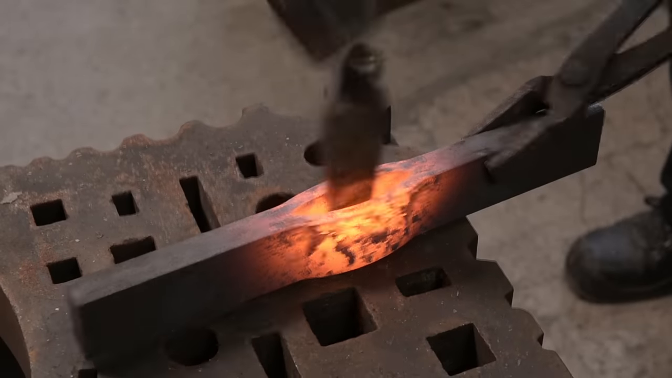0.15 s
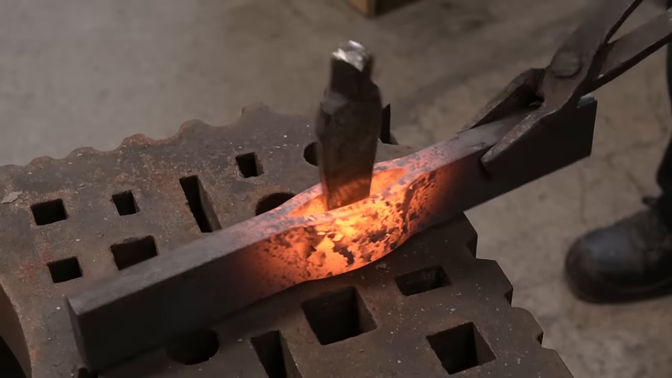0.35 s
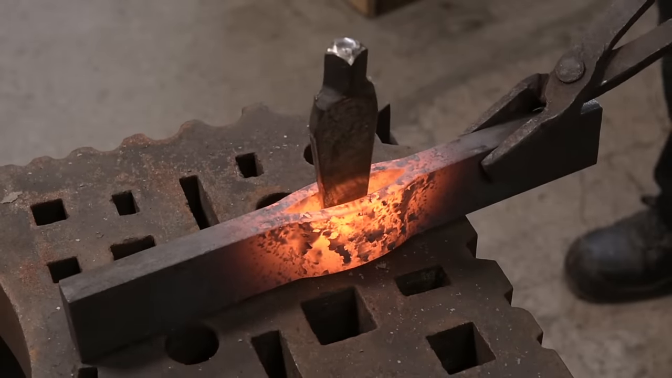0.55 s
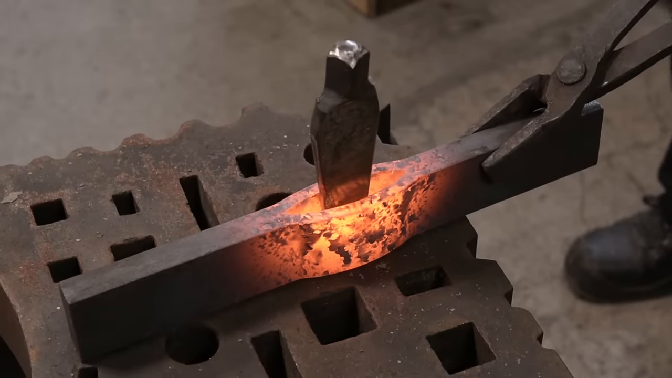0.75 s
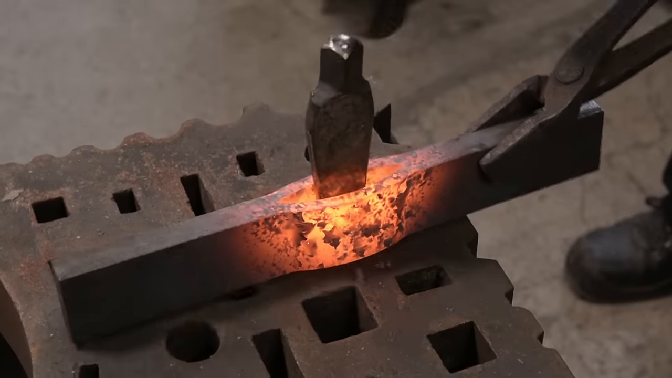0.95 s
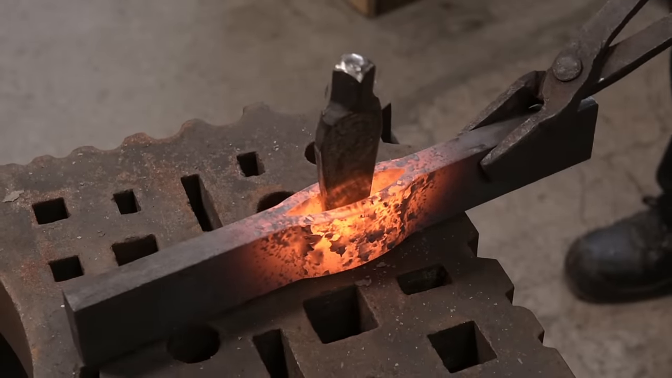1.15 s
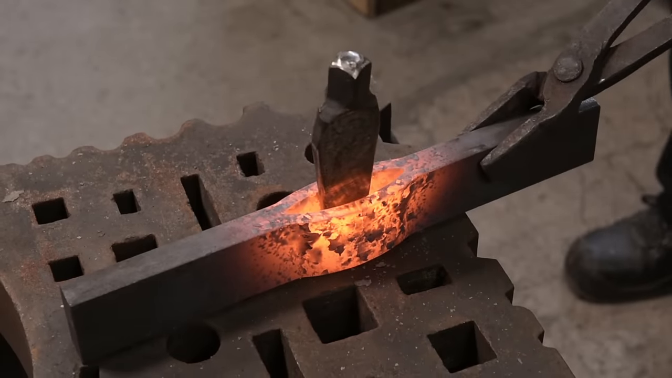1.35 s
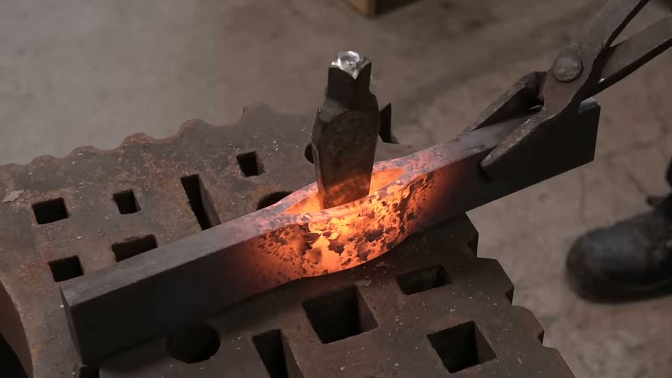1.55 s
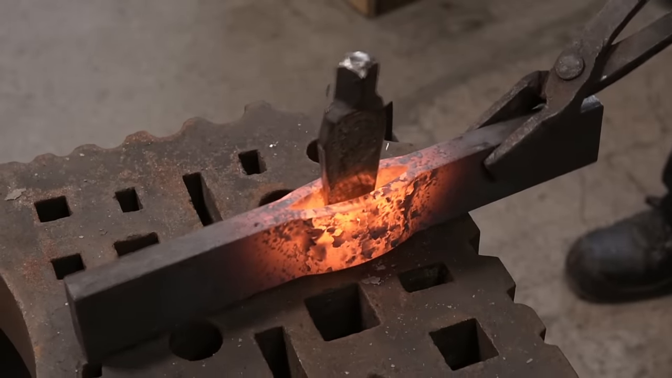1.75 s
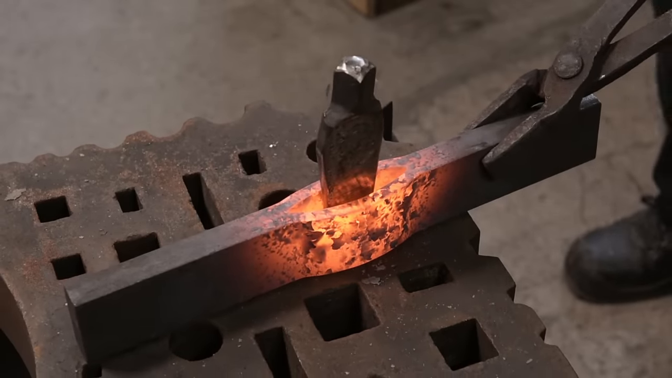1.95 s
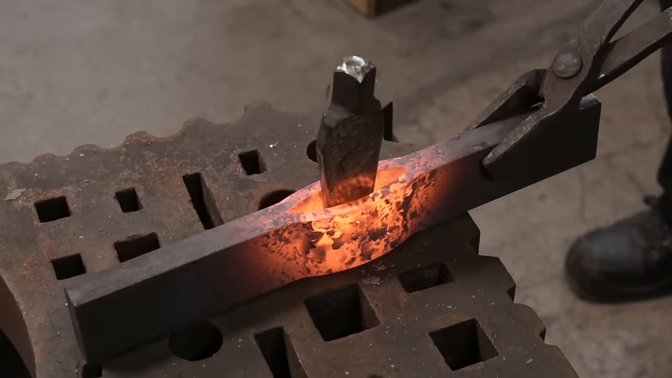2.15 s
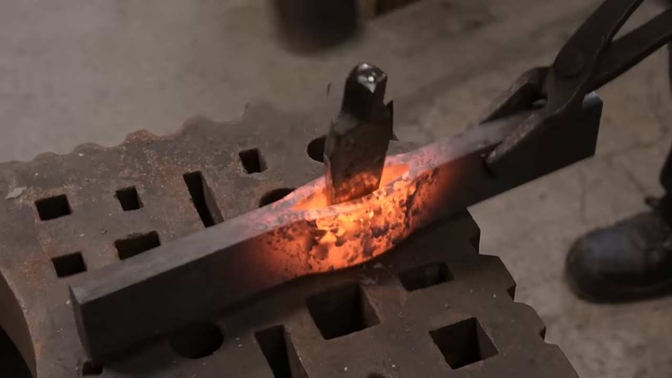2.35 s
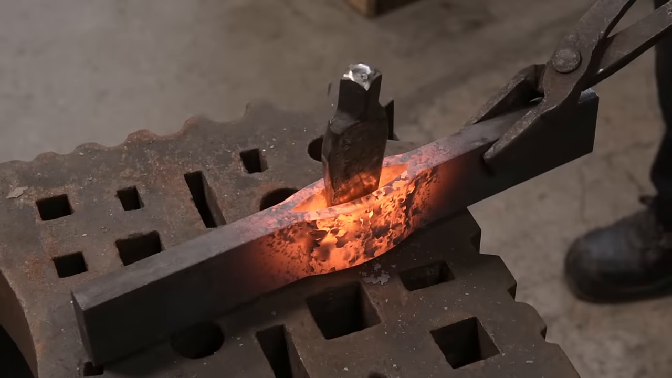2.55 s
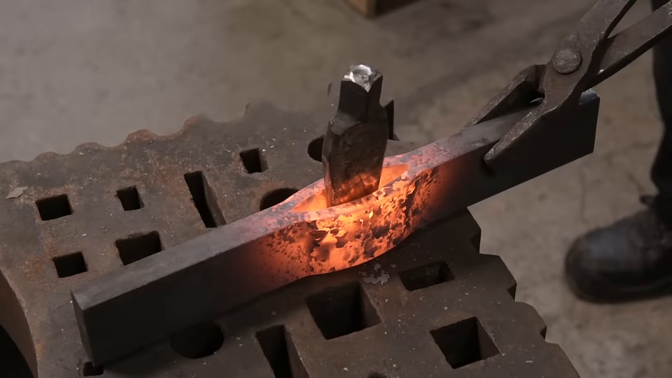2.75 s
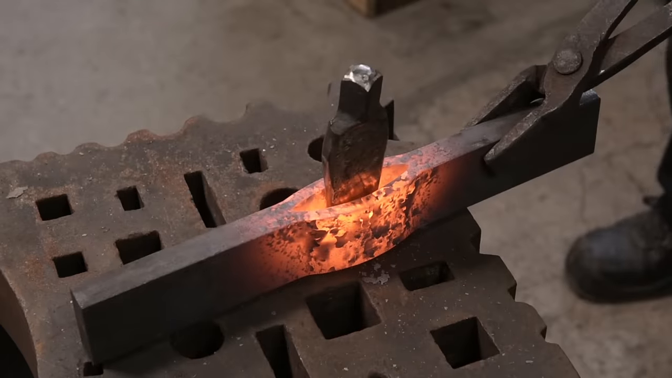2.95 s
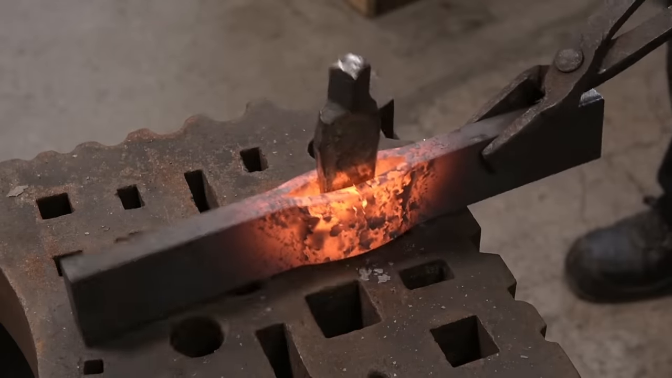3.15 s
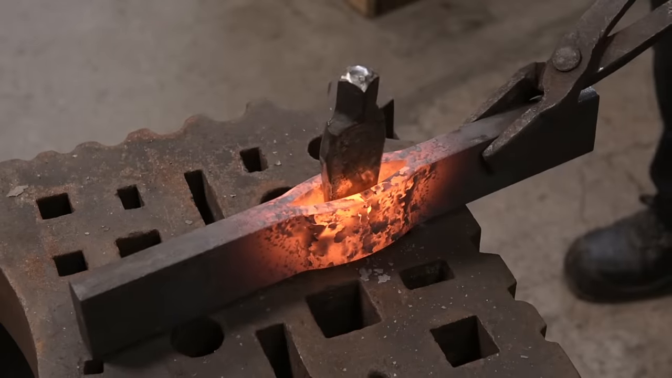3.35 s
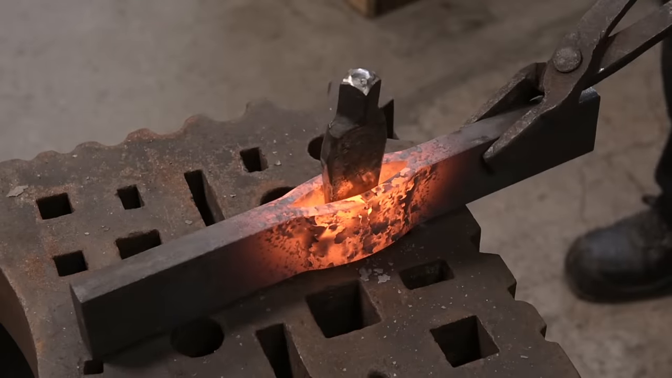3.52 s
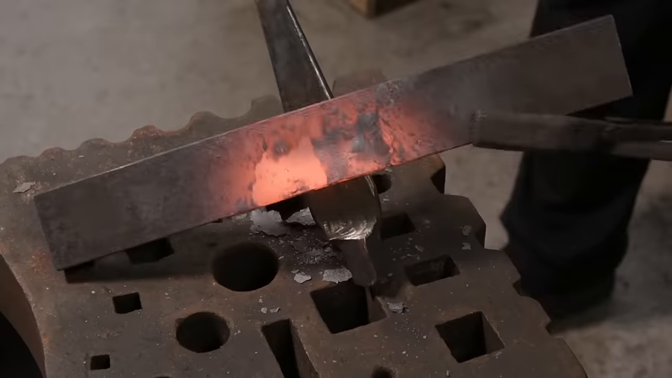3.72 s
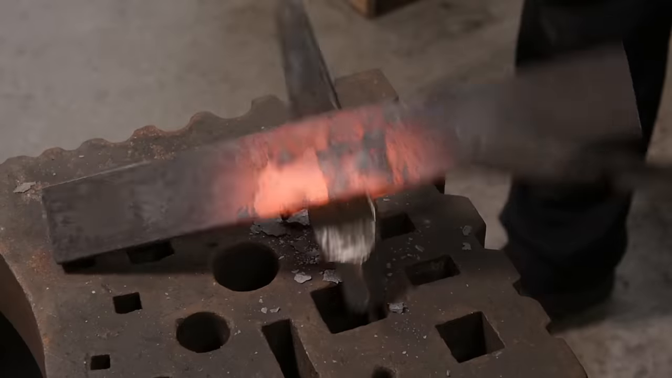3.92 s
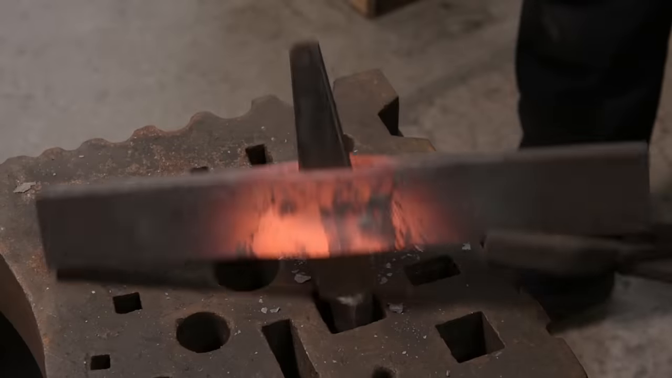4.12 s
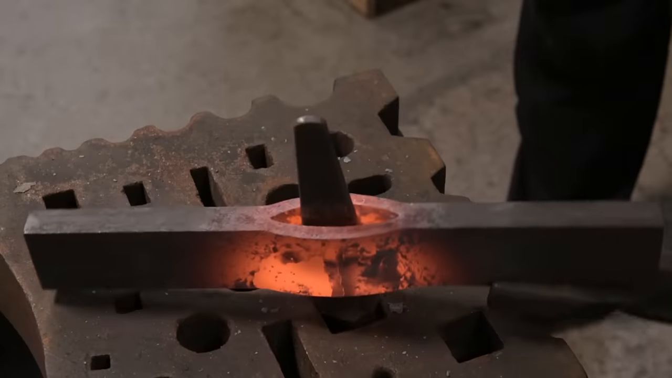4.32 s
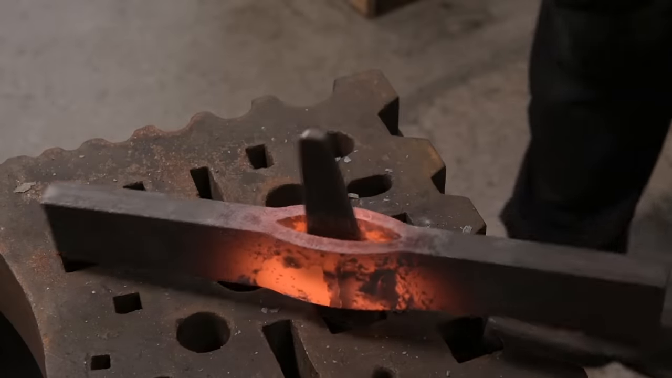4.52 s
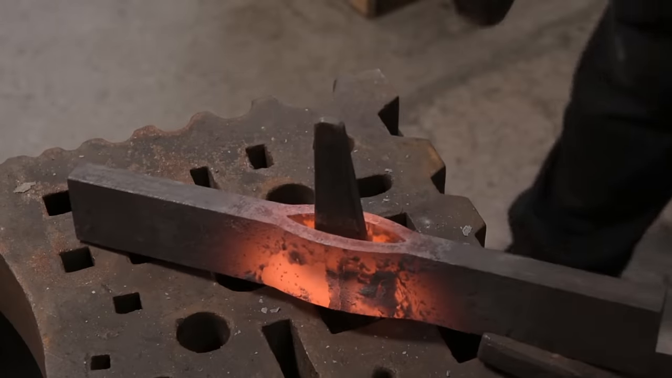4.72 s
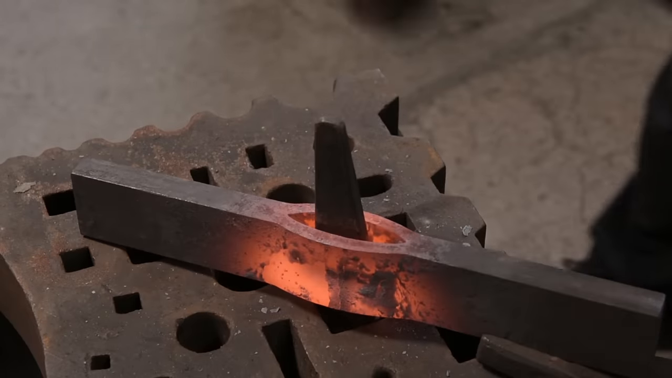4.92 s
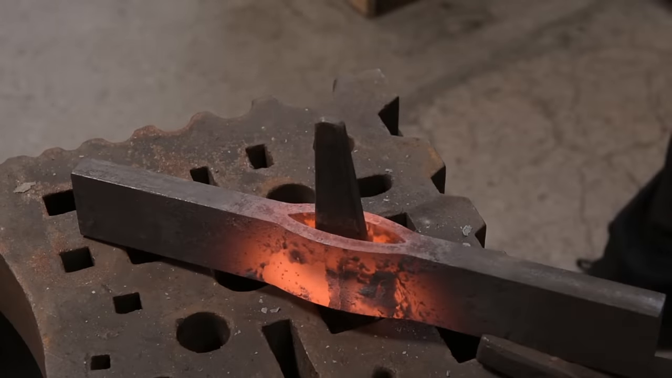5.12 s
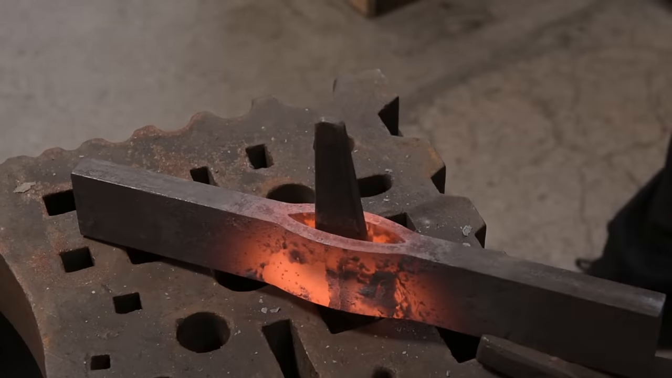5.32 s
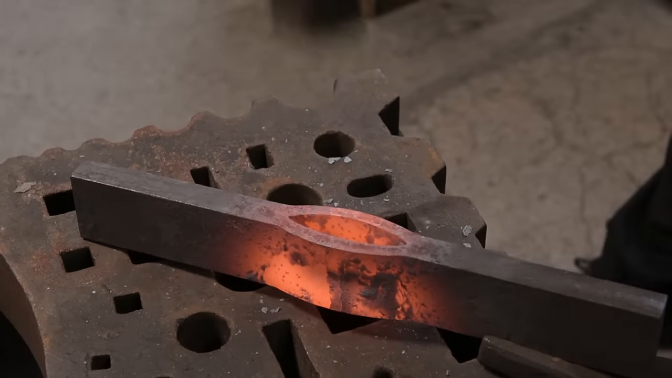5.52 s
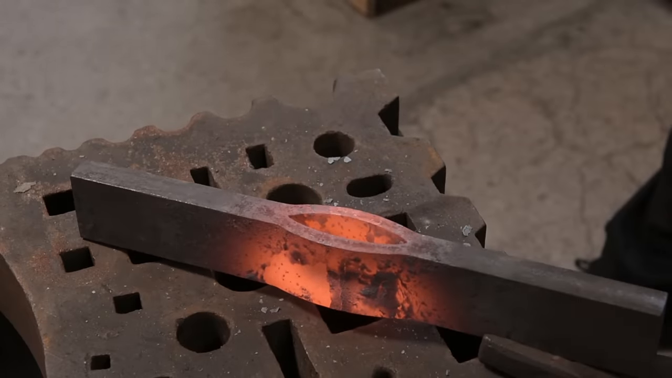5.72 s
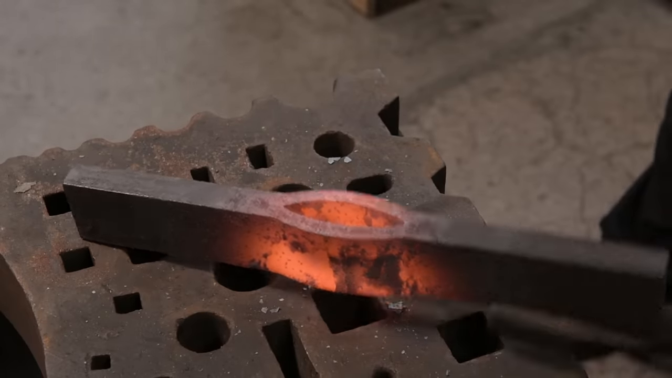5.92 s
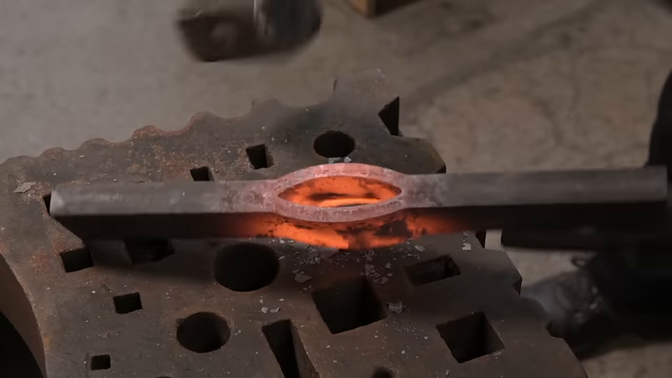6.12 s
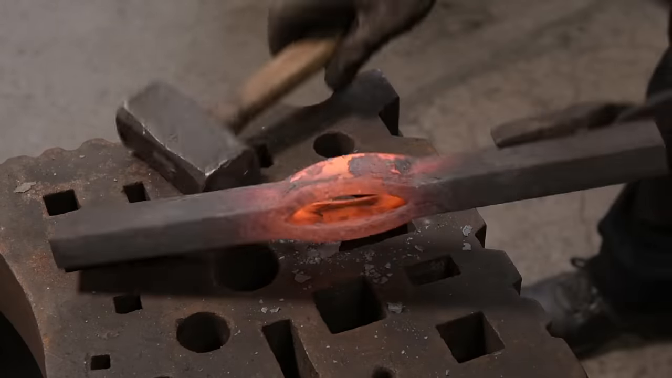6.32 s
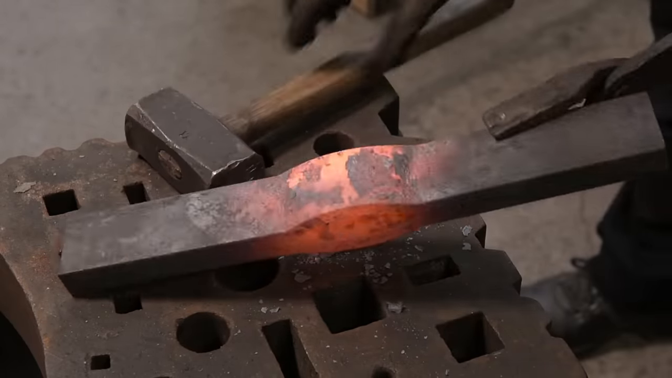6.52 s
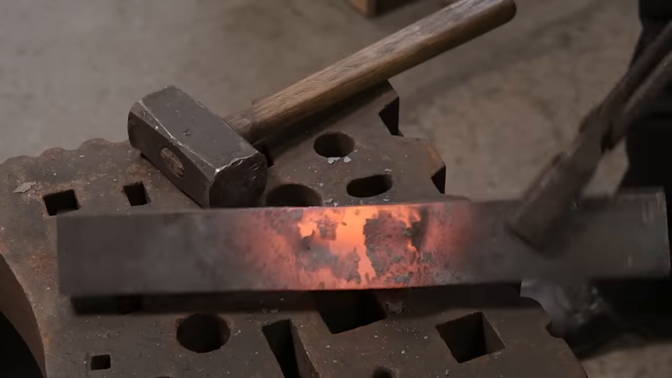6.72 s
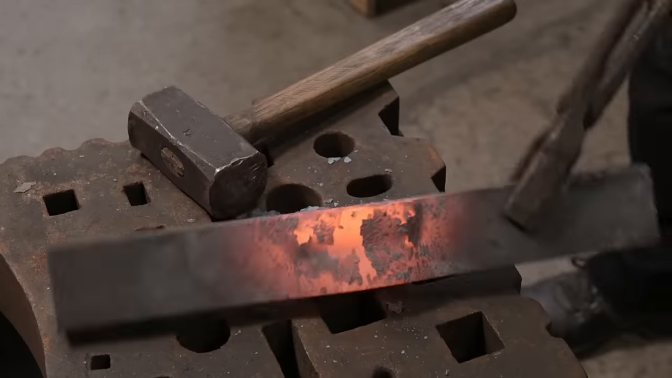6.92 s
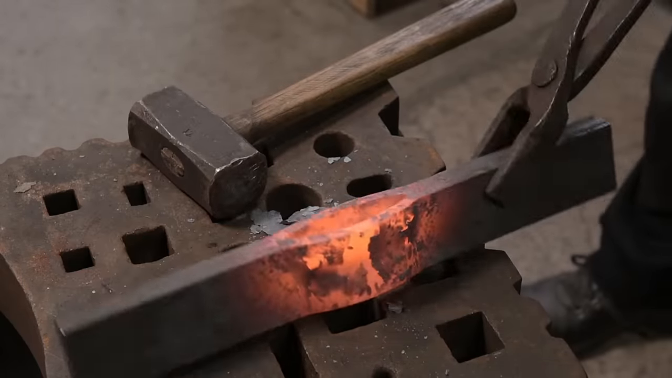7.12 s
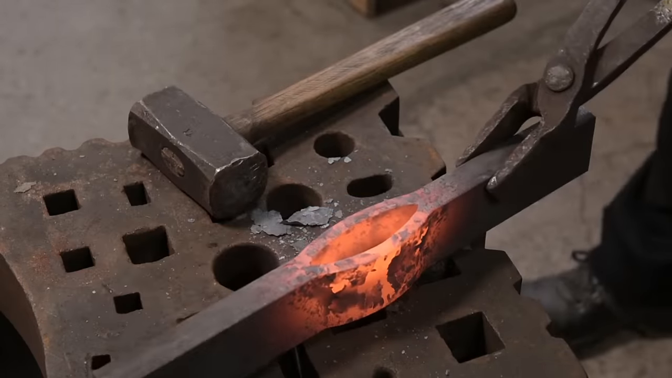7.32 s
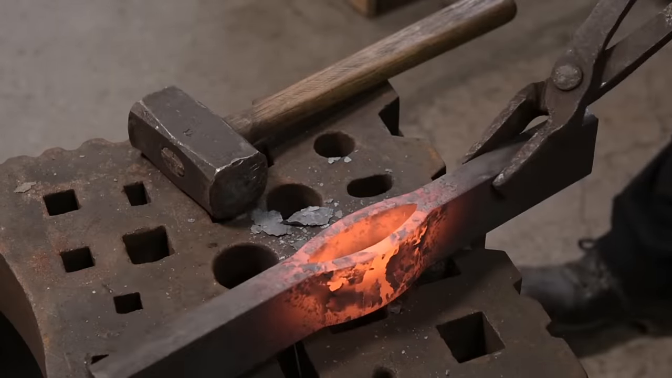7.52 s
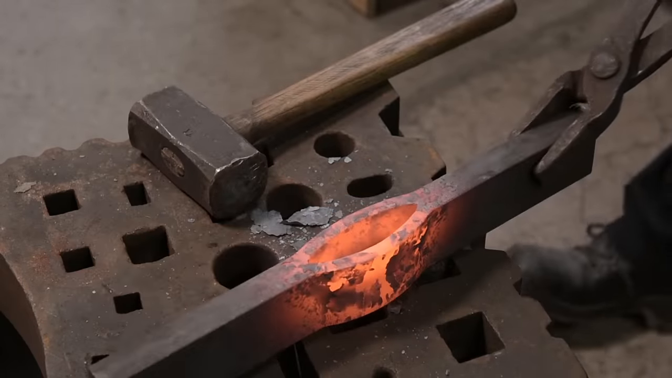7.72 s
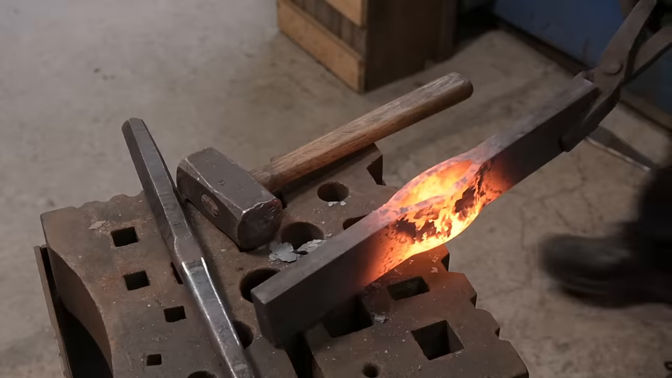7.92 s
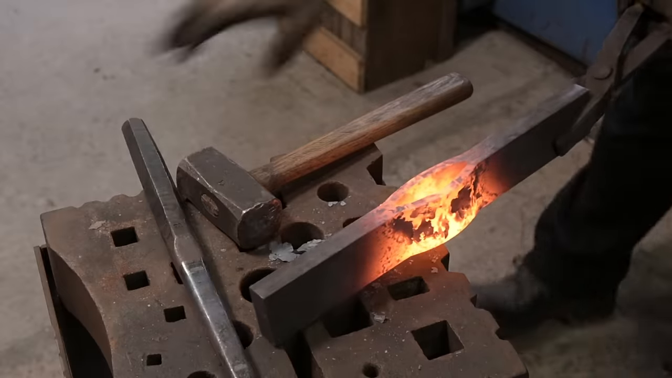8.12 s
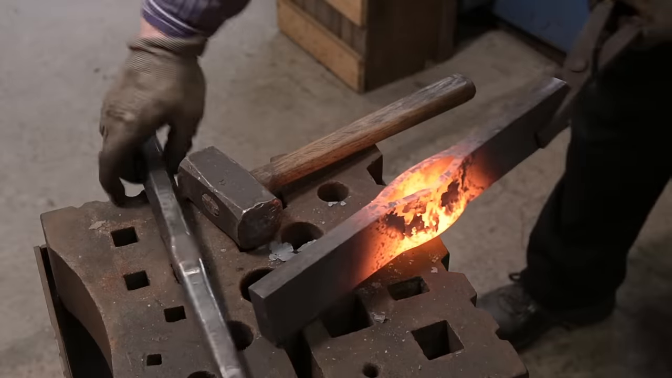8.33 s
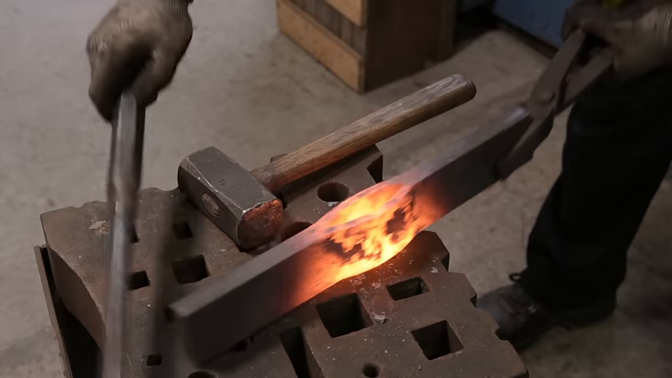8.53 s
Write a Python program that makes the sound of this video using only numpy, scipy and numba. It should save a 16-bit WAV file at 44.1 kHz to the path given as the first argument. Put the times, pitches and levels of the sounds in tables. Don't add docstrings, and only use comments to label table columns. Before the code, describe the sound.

Evenly spaced, heavy hammer cracks with short clangy metal ring and low stand thud, then softer shuffling and knocking as the work is turned. One last blow sends a steel drift singing and tumbling, with hard floor bounces. Hammer and bar clatter down, scrape and settle; a long steel tool is lifted with a bright tick. Close, distorted, compressed, in a reverberant workshop with low hum.

```python
import sys
import numpy as np
from scipy import signal
from scipy.fft import rfft, irfft, next_fast_len
from scipy.io import wavfile
from scipy.ndimage import uniform_filter1d
from numba import njit

SR = 44100
rng = np.random.default_rng(int(sys.argv[2]) if len(sys.argv) > 2 else 0)


def unload_audio(sound):
    columns = np.transpose(np.atleast_2d(sound))
    steps = np.round(np.clip(columns, -1, 1) * 32767)
    wavfile.write(sys.argv[1], SR, steps.astype(np.int16))


def volts(x):
    e = np.asarray(x, float) / 20
    return 10 ** e


N = 382347

# pitch_hz, level_db, t60_s
BLOCK_MODES = [(1220, -19.5, 1), (1232, -16, 0.097), (1260, -8, 0.52), (1366, -6.5, 0.98),
               (1550, -3.5, 0.49), (1688, -1.5, 0.41), (1790, 4, 0.2), (1913, -0.5, 0.21),
               (1940, -0.5, 0.27), (2060, -3.5, 0.35), (2194, -7, 0.3), (2493, -2.5, 0.24), (2780, 3, 0.17),
               (3175, -4, 0.44), (3395, -7.5, 0.54), (3930, -10.5, 0.55), (4163, -20.5, 0.1),
               (5500, -7, 0.11), (6400, -9, 0.15), (7340, -27, 0.18)]
# pitch_hz, level_db, t60_s
STAND_MODES = [(55.2, -2, 1), (64.7, -4.5, .8), (154, -8, 0.44), (202.3, -6.5, 0.44), (240, -20, 0.053)]


def blows():
    # start_s, block_ring_db, crack_db, bright_crack_db, weight_db (shakes stand, rings head)
    hits = [
        (0.2312, 3.5, 9.5, -5.5, -18),
        (0.987, 1.5, 6.5, 8.5, -21),
        (1.7021, 3, 7.5, 4.5, -18),
        (2.3950, 1, 5.5, 3, -24.5),
        (3.0863, 3.5, 10, -1.5, -22.5),
        (5.4536, -14, 4.5, 5.5, -32.5),
    ]
    # pitch_hz, level_db, t60_s
    head_modes = [(11380, 4.5, 0.6), (14350, -2, .4), (5460, 7.5, .25), (6300, 10, 0.22)]
    s, block_db, crack_db, bright_db, weight_db = np.transpose(hits)
    body = struck(BLOCK_MODES, s, block_db - 8.5, spread_db=-4.0, damping=0.18)
    rattle = chatter(BLOCK_MODES, s, block_db - 33.5, t60=0.39, damping=0.14)
    snap = crack(s, crack_db, 1400, 4500, t60=0.075)
    bright_snap = crack(s, bright_db, 3600, 19000, t60=0.02)
    boom = crack(s, crack_db - 9.5, 110, 320, t60=0.081)
    head = struck(head_modes, s, weight_db - 8, spread_db=6.5, damping=0.15)
    thud = struck(STAND_MODES, s + 0.0012, weight_db + 4, spread_db=0.5, damping=1.0)
    return body + rattle + snap + bright_snap + boom + head, thud


def drift():
    # start_s, knock_db, bending_ring_db, twisting_ring_db, upper_ring_db
    bounces = [
        (5.4538, 0, -38, -50, -26),
        (5.7007, 8, -20, -24, -22),
        (5.848, 0, -28, -34, -28),
        (6.0584, 6, -20, -34, -22),
        (6.31, -14, -22, -20, -24),
        (6.408, -14, -50, -22, -23),
        (6.593, -30, -65, -52, -46),
        (6.82, -50, -90, -90, -80),
    ]
    # takeoff_s, main_ring_db, edge_on_s, half_turn_s, beating_twin_db
    tumbling = [(5.4538, -11, 5.2, 1.5, -6), (5.848, -22, 5.7, .6, -6), (6.288, -5, 6.2, .3, -16),
                (6.408, -20, 6.2, .8, -6), (5.7007, 5, 5.752, .115, -30), (5.922, -5, 5.89, .2, -26),
                (6.0584, 8, 6.21, .13, -30), (6.245, -2, 6.23, .12, -30), (6.593, -44, 6.4, .8, -4),
                (6.82, -90, 6.4, .8, -8)]
    # pitch_hz, level_db, t60_s, ring family (0 bending, 1 twisting, 2 upper, 3 lengthwise)
    drift_modes = [(1272, 0, 1.5, 0), (4407, 2, 1.0, 1), (5345, 0, 1.2, 1), (5318, -7, 1.2, 1),
                   (6212, 0, 1.5, 2), (6238, -7, 1.2, 2), (9625, -9, .9, 2), (9962, -9, .7, 2),
                   (13990, 0, .8, 3), (13946, -5, .8, 3), (14400, -5, .8, 3), (15020, -20, .8, 3)]
    rows, flights = np.array(bounces), np.array(sorted(tumbling))
    live = slice(int(rows[0, 0] * SR) + 1, int(7.2 * SR))
    t = time_axis()[live]
    flight = np.clip(np.searchsorted(flights[:, 0], t) - 1, 0, None)
    takeoff, main_db, edge_on, half_turn, twin_db = flights[flight].T
    turn = np.pi * (t - edge_on) / half_turn

    tone = np.sin(2 * np.pi * 3310 * t) + volts(twin_db) * np.sin(2 * np.pi * 3336 * t)
    main_t60_s, beam_width, edge_leak_db = 1.8, 2.2, -18
    facing = np.hypot(np.tanh(beam_width * np.sin(turn)), volts(edge_leak_db))
    main_gain = volts(main_db - 60 * (t - takeoff) / main_t60_s) * facing
    sound = uniform_filter1d(main_gain, size=200) * tone

    last = np.clip(np.searchsorted(rows[:, 0], t) - 1, 0, None)
    since = t - rows[last, 0]
    along_db = -2.5 - 26.5 * (last > 0) - 6 * np.maximum(last - 1, 0)
    family_db = [*rows[last, 2:].T, along_db]
    phase = rng.uniform(0, 2 * np.pi, (len(rows), len(drift_modes)))
    side_beam = np.hypot(np.cos(turn), volts(-8))
    for k, (hz, db, t60, family) in enumerate(drift_modes):
        beam = side_beam if hz < 5000 else np.hypot(np.cos(2.6 * turn + k), volts(-8))
        level_db = family_db[round(family)] + db - 60 * since / t60
        sound += volts(level_db) * beam * np.sin(2 * np.pi * hz * since + phase[last, k])
    rings = np.zeros(N)
    rings[live] = sound

    s, knock_db = rows[:, 0], rows[:, 1]
    floor = crack(s, knock_db + 0.78, 180, 2100, t60=0.017) + crack(s, knock_db - 4, 250, 1900, t60=0.01)
    return rings, floor + crack(s, knock_db - 24, 4500, 15000, t60=0.0087)


def clanks():
    # start_s, peak_db, bright_crack_db and stand_thud_db (both relative to the peak)
    drops = [
        (0.4231, -10.5, -32.5, -17),
        (0.4544, -13, -39, -5),
        (0.5075, -38, -33.5, -31),
        (0.6046, -43, -37, -16.5),
        (4.1665, -32.5, -33, -28),
        (4.724, -27, -33, -42),
        (6.42, -6, -18.5, -26),
        (6.5935, -19, -21, -23),
        (6.6965, -21, -28.5, -22),
        (7.897, -17.5, -37.5, -10.5),
    ]
    # pitch_hz, level_db, t60_s
    bar_modes = [(1600, -12, 0.4), (1720, -2, .35), (1790, 0, 0.5), (1840, 0, 0.5), (1905, 2, 0.3),
                 (1955, -1, 0.3), (2010, -3, 0.4), (2060, -8, .3), (2830, -13, 0.5), (3430, -16, 0.3),
                 (3960, -12, 0.35), (4040, -13, 0.3)]
    s, peak_db, bright_db, thud_db = np.transpose(drops)
    body = struck(bar_modes, s, peak_db - 13.5, spread_db=4.0, damping=0.3)
    body = body + chatter(bar_modes, s, peak_db - 37, t60=0.25, damping=0.2)
    tick = crack(s, peak_db + bright_db - 1, 3500, 19000, t60=0.0057)
    snap = crack(s, peak_db - 7.5, 1400, 3000, t60=0.014)
    jolt = struck(STAND_MODES[:2], s, peak_db + thud_db, spread_db=7.0, damping=0.11)
    return band(body, 1000, 4500) + tick + snap, jolt


def knocks():
    # start_s, block_ring_db, weight_db (dull crack and stand thud), bright_tick_db
    contacts = [(3.716, -32, -30.5, -60), (3.949, -39.5, -39, -63), (4.049, -18, -23.5, -55),
                (4.119, -46, -37.5, -71), (4.166, -32, -30.5, -70), (4.259, -28, -31, -59),
                (4.309, -50.5, -49, -66), (4.66, -50, -47, -72), (4.693, -20.5, -29.5, -51),
                (4.809, -46, -42, -51), (6.283, -4.5, -31, -34), (6.309, -3, -34, -28),
                (6.369, -27, -45, -33.5), (6.406, -31, -47, -23), (6.506, -36, -33, -47),
                (6.594, -6, -32, -49.5), (6.698, -20.5, -40.5, -71), (6.761, -16.5, -39, -83),
                (6.814, -30, -21, -46.5), (6.988, -14, -32.5, -38), (7.362, -51.5, -41, -62),
                (7.766, -35, -42.5, -59), (8.36, -36.5, -50, -62)]
    # start_s, level_db
    scale_ticks = [(4.599, -55), (7.499, -69), (7.534, -60), (8.154, -63.5), (8.271, -55)]
    # pitch_hz, level_db, t60_s
    tong_modes = [(5340, -0.5, 0.15), (7060, -10.5, 0.11), (9200, -21, 0.14), (11380, -23, 0.18),
                  (3690, 10.5, 0.18), (1970, 21, .2)]
    # start_s, level_db
    jaw_taps = [(4.167, -46.5), (4.261, -54), (4.63, -63)]
    # start_s, level_db
    rivet_taps = [(7.767, -50)]
    s, ring_db, weight_db, tick_db = np.transpose(contacts)
    body = struck(BLOCK_MODES[:17], s, ring_db - 22, spread_db=10.5, damping=0.13)
    body = body + crack(s, weight_db, 80, 1400, t60=0.21)
    tick = crack(s, tick_db + 9.5, 4000, 16000, t60=0.006)
    scale = crack(*np.transpose(scale_ticks), 2200, 7900, t60=0.042)
    jaws = struck(tong_modes, *np.transpose(jaw_taps), spread_db=11.5, damping=0.39)
    rivet = struck(tong_modes[1:4], *np.transpose(rivet_taps), spread_db=8, damping=0.74)
    bump = struck(STAND_MODES, s, weight_db - 13.5, spread_db=4.0, damping=1.0)
    return band(body, 80, 3440) + tick + scale + jaws + rivet, bump


def chisel():
    # start_s, low_modes_db, middle_modes_db, high_modes_db, tick_db
    lifts = [
        (8.381, -43, -55, -77, -40),
        (8.402, -66, -18, -17.5, -18.5),
        (8.483, -25.5, -31.5, -54, -28),
        (8.551, -25, -34.5, -48.5, -22),
    ]
    # pitch_hz, level_db, t60_s
    chisel_modes = [(1174, -6, .4), (1540, -5, .35), (2105, 0, .35), (2772, -2, .4), (3289, -2, .15),
                    (3359, 3, .4), (4414, -8, .35), (4549, -14, .2), (4926, -6, .35), (6519, 0, .2),
                    (7967, -18, .15), (8441, -4, .27), (9921, -14, .4), (10670, -12, .33),
                    (12860, -18, .45), (13440, -22, .3), (15340, -10, .35)]
    s, low_db, middle_db, high_db, tick_db = np.transpose(lifts)
    low = struck(chisel_modes[:4], s, low_db, spread_db=1, damping=0.45)
    middle = struck(chisel_modes[4:9], s, middle_db, spread_db=1, damping=0.4)
    high = struck(chisel_modes[9:], s, high_db, spread_db=3, damping=0.71)
    tick = crack(s, tick_db, 900, 5000, t60=0.0077)
    rattle = chatter(chisel_modes[:9], s, middle_db - 31.5, t60=0.45, damping=0.2)
    return low + middle + high + tick + rattle


def drag():
    # start_s, length_s, grit_db, stand_shake_db
    drags = [(3.744, 0.23, -67, -44), (4.043, 0.33, -52, -33), (4.42, .2, -67, -48),
             (4.632, 0.55, -62, -40), (5.851, .07, -14, -60), (6.297, .1, -41, -65),
             (6.409, 0.19, -24.5, -50), (6.69, 0.3, -53, -51), (6.926, 0.13, -43, -47.5),
             (7.104, 0.19, -72, -68), (7.363, 0.21, -79, -42), (7.761, 0.022, -50.5, -65)]
    clicks = rng.random(N) < 5000 / SR
    sizes = volts(4.8 * np.minimum(rng.exponential(1, N), 4))
    grit = clicks * sizes * rng.choice([-1, 1], N)
    ring = through(BLOCK_MODES, 0.3, grit)
    scrape = volts(9.5) * band(grit, 1400, 4300) / np.std(grit)
    sound = band(ring / np.std(ring) + scrape, 750, 6500)
    shake = through(STAND_MODES, 0.14, grit)
    s, length, grit_db, shake_db = np.transpose(drags)
    shape = dict(rise=5995, sag=44, fall=200.5)
    grit_gain = strokes(s, length, grit_db, **shape)
    return grit_gain * sound, strokes(s, length, shake_db, **shape) * shake / np.std(shake)


def scuffs():
    # start_s, length_s, level_db
    brushes = [(4.418, .01, -59.5), (4.609, .02, -54.5), (4.702, 0.22, -90.5), (4.949, .1, -44),
               (6.82, 0.043, -51), (6.949, 0.068, -36), (7.317, .01, -61.5)]
    # pitch_hz, density_db (per Hz)
    scuff_colour = [(470, -44.5), (800, -7), (1330, 0.5), (1840, -0.5), (1930, -0.5), (3130, 1.5),
                    (4710, -10), (15500, -26.5)]
    gain = strokes(*np.transpose(brushes), rise=230, sag=0, fall=230)
    return gain * volts(1.5) * coloured(scuff_colour)


def air():
    # pitch_hz, density_db (per Hz)
    air_colour = [(18, -24), (30, -3.5), (93, 3), (210, -1), (295, -5), (499, -2.5), (1590, -12.5),
                  (1760, -9), (2540, -22), (3310, -15), (5040, -31.5), (13300, -39.5), (16000, -60)]
    return volts(-53 + 1.5) * coloured(air_colour)


def workshop(x):
    # pitch_hz, t60_s
    room_t60 = [(100, 0.57), (300, 0.64), (1000, 0.46), (2500, 0.41), (5000, 0.28), (9000, 0.093),
                (15000, 0.16)]
    # pitch_hz, level_db
    room_colour = [(100, 2), (400, -3), (1500, -2), (4000, 2.5), (9000, 3), (15000, -3)]
    t = np.arange(SR) / SR
    edges = 60 * 2 ** np.arange(0, 8.1, 0.5)
    tail = 0
    for low, high in zip(edges, edges[1:]):
        hz = np.sqrt(low * high)
        fall = volts(at_hz(room_colour, hz) - 60 * t / at_hz(room_t60, hz))
        tail = tail + band(rng.standard_normal(SR), low, high) * fall
    tail = tail * (1 - np.exp(-t / 0.011))
    return signal.fftconvolve(x, tail / np.sqrt(np.sum(tail ** 2)))[:N]


def struck(modes, times, level_db, spread_db, damping):
    chance = rng.standard_normal((len(times), len(modes)))
    strength = volts(level_db[:, None] + spread_db * chance)
    return placed(times, strength @ rings_of(modes, damping))


def crack(times, level_db, low_hz, high_hz, t60):
    noise = band(rng.standard_normal((len(times), SR // 2)), low_hz, high_hz)
    noise = noise[:, 2000:]
    fall = volts(level_db[:, None] - 60 * np.arange(noise.shape[1]) / SR / t60)
    return placed(times, fall * noise / np.std(noise))


def chatter(modes, times, level_db, t60, damping):
    return through(modes, damping, crack(times, level_db, 310, 16000, t60))


def through(modes, damping, force):
    return signal.oaconvolve(force, rings_of(modes, damping).sum(axis=0))[:N]


def rings_of(modes, damping):
    hz, level_db, t60 = np.transpose(modes)[:, :, None]
    t = np.arange(int(1.3 * damping * t60.max() * SR) + 1) / SR
    return volts(level_db - 60 * t / (t60 * damping)) * np.sin(2 * np.pi * hz * t)


def placed(times, sounds):
    out = np.zeros(N + sounds.shape[1])
    for s, sound in zip(times, sounds):
        first = round(s * SR)
        out[first:first + len(sound)] += sound
    return out[:N]


def strokes(start, length, level_db, rise, sag, fall):
    coarse = time_axis()[::32]
    since = coarse - start[:, None]
    length = length[:, None]
    loss_db = rise * np.maximum(-since, 0) + sag * np.clip(since, 0, length)
    loss_db = loss_db + fall * np.maximum(since - length, 0)
    return np.interp(time_axis(), coarse, volts(level_db[:, None] - loss_db).sum(axis=0))


def time_axis():
    return np.arange(N) / SR


def at_hz(points, hz):
    table_hz, value = np.transpose(points)
    return np.interp(np.log(hz), np.log(table_hz), value)


def coloured(spectrum):
    size = next_fast_len(N, real=True)
    hz = np.maximum(np.fft.rfftfreq(size, 1 / SR), 1)
    x = irfft(rfft(rng.standard_normal(size)) * volts(at_hz(spectrum, hz)), size)[:N]
    return x / np.std(x)


def band(x, low_hz, high_hz):
    return signal.sosfilt(signal.butter(2, [low_hz, high_hz], "band", fs=SR, output="sos"), x)


def scene():
    hit, thud = blows()
    rings, bounce = drift()
    clank, jolt = clanks()
    knock, bump = knocks()
    grit, shake = drag()
    contacts = hit + knock + clank + grit + scuffs()
    lows = thud + bump + jolt + shake
    loose = bounce + chisel()
    sent = volts(-10.5) * contacts + volts(-13.5) * loose + volts(-23) * rings + volts(-4.0) * lows
    return (contacts + rings + loose + lows + workshop(sent) + air())[None]


@njit
def follow(wanted_db, attack, release):
    gain_db, state = np.empty_like(wanted_db), 0.0
    for i in range(len(wanted_db)):
        state += (attack if wanted_db[i] < state else release) * (wanted_db[i] - state)
        gain_db[i] = state
    return gain_db


def compressor(x, threshold_db, slope, sense_s, attack_s, release_s):
    k = 1 / (sense_s * SR)
    level_db = 10 * np.log10(signal.lfilter([k], [1, k - 1], x ** 2) + 1e-12)
    wanted_db = -slope * np.maximum(level_db - threshold_db, 0)
    return x * volts(follow(wanted_db, 1 / (attack_s * SR), 1 / (release_s * SR)))


def roll_off(x):
    return signal.sosfilt(signal.butter(12, 16320, fs=SR, output="sos"), x)


def record(dry):
    heard = band(dry[0], 36, 12000)
    heard = heard + 0.03 * band(np.clip(heard, -2, 2) ** 2, 30, 16000)
    overloaded = heard / (1 + np.abs(heard) ** 5.6) ** (1 / 12.0)
    held = compressor(overloaded, threshold_db=-26.0, slope=0.67,
                      sense_s=0.011, attack_s=0.0087, release_s=0.018)
    return roll_off(np.clip(0.77 * held, -1, 1)[None])


dry = scene()
out = record(dry)
unload_audio(out)
```